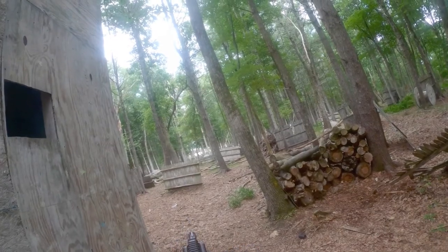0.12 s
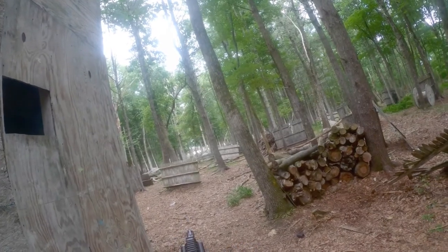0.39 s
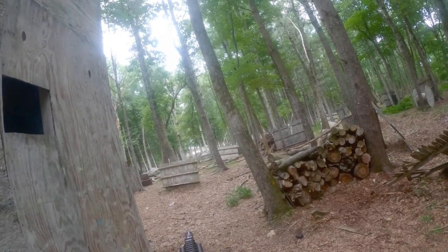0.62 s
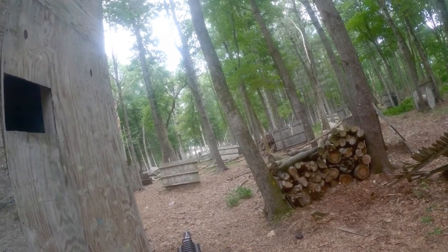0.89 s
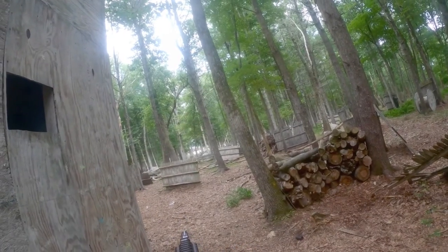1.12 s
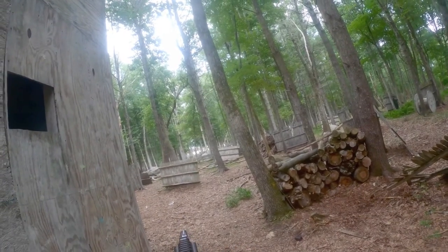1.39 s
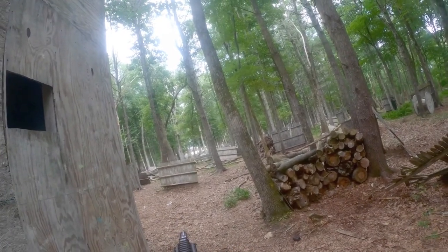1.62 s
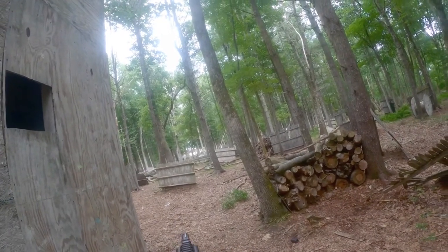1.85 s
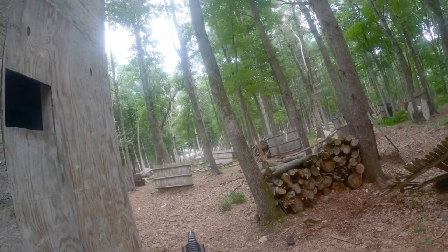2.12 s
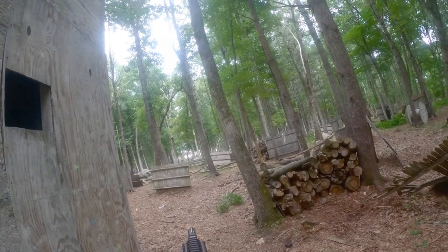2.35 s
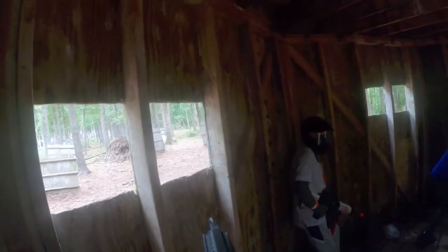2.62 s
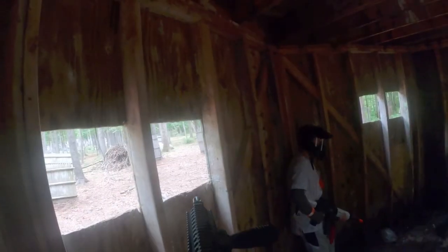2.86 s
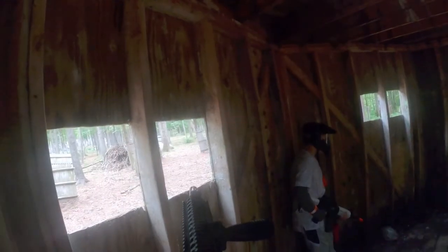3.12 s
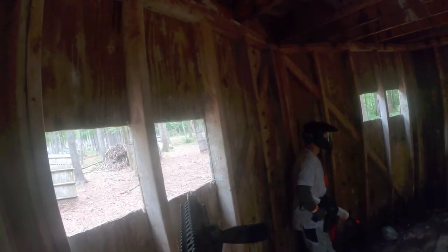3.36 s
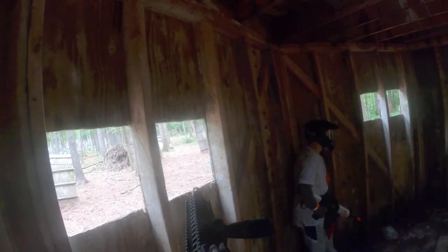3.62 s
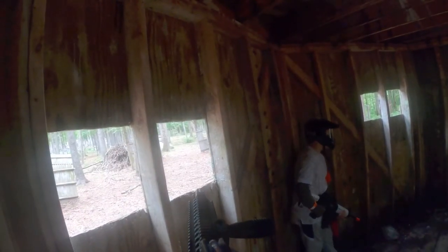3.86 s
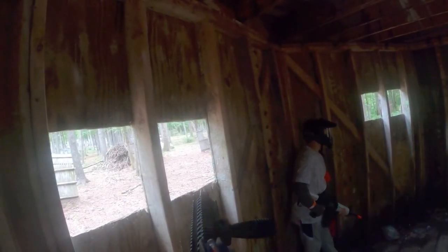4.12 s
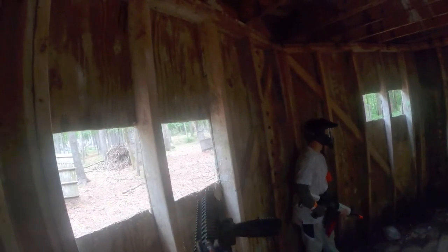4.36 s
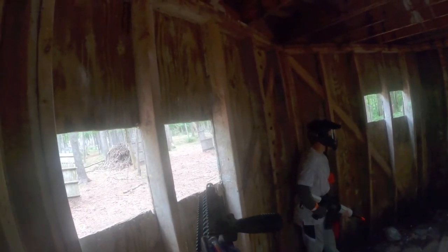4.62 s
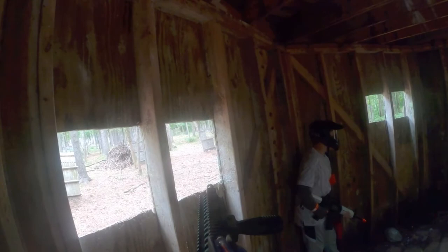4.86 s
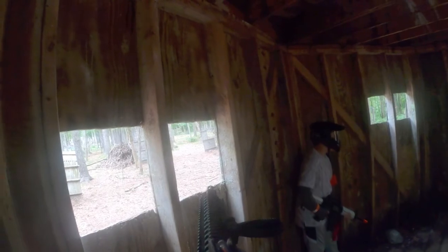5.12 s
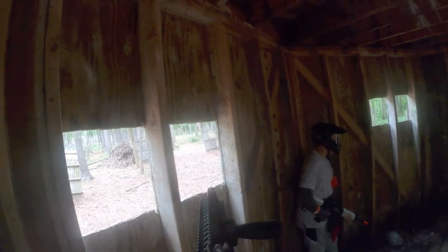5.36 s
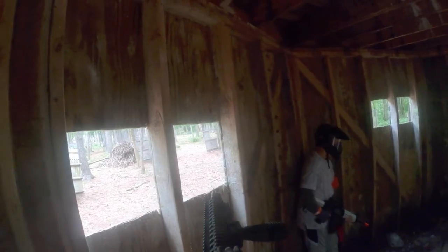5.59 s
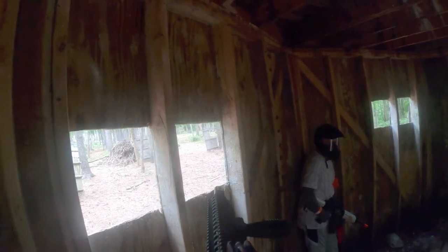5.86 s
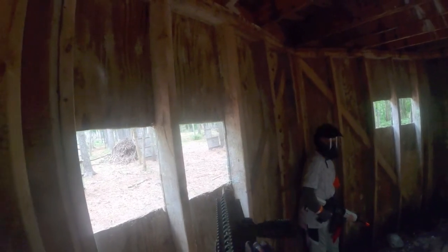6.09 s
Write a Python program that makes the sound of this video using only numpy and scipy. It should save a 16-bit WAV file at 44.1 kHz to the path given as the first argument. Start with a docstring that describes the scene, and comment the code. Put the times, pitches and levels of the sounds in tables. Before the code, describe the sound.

From 0 to 1.7 s an electric spring-piston gun fires eleven quick shots right beside a small cased camera among trees: each a short rising motor whine with gear rattle, a low thump and sharp metallic crack, then a falling whirr. The first shots come about 0.2 s apart, then 0.15 s; trigger ticks fall between some. A tiny dropout occurs at 0.61 s. From 1.8 to 2.5 s the gun rests; a soft bright noise swells near 1.95 s while a similar gun whines far off, growing. Around 2.58 s a shot begins and is cut as the level dips. Inside a plywood hut, hiss swells up and a pellet rattles on board at 2.8 s. From 3.0 s to the end, steady shots come about five per second, boxier and louder, with gusty rumble, low case knocks, notably at 3.5, 4.1, 4.4 and 4.9 s, and pellets striking boards at 4.8 s and repeatedly after 5.6 s.

```python
"""An electric spring-piston air gun fires a quick string of shots among trees, close to a small camera; the sound
cuts out for a moment. In a pause comes a soft bright swell of noise, likely the far gun's echo, as a like gun
whines far off. The level dips, then the gun fires on in a plywood hut, with stronger wind and buffets on the case
and pellets striking boards. At each pull a motor winds up (gear whine and rattle), the piston thumps the gun and
cracks, and the gears run down; after many pulls the trigger clicks back. Whines are sines, the rest mostly noise."""
import sys
import numpy as np
from scipy import signal
from scipy.fft import rfft, irfft
from scipy.io import wavfile
from scipy.ndimage import uniform_filter1d

SR = 44100
rng = np.random.default_rng(int(sys.argv[2]) if len(sys.argv) > 2 else 0)


def how_loud(loudness_db):
    """Turn decibels into a plain amplitude multiplier (0 dB gives 1, 20 dB gives 10)."""
    steps = np.asarray(loudness_db, float) / 20
    return 10 ** steps


def to_wav(sig):
    """Store sig (one row per channel, or 1-D mono) as 16-bit WAV at the path in sys.argv[1].

    Samples outside -1..1 are clipped; the rate is SR.
    """
    pcm = np.clip(np.atleast_2d(sig), -1, 1) * 32767
    pcm = np.round(pcm).astype(np.int16)
    wavfile.write(sys.argv[1], SR, pcm.T)  # frames by channels


N = 274743
TIME = np.arange(N) / SR
HUT_S, QUIET_S = 2.59, 2.75  # the hut begins; the gun is silent from then until QUIET_S
GAP_START_S, GAP_END_S = .612, .631  # a short gap of silence
USUAL_CATCH_S = .024  # usual time from the crack until the coasting gears catch again


def band(x, lo_hz, hi_hz, order=2):
    """Keep only the sound between two frequencies."""
    return signal.sosfilt(signal.butter(order, [lo_hz, hi_hz], "band", fs=SR, output="sos"), x)


def unit(x):
    """Scale to an rms level of 1."""
    return x / np.sqrt(np.mean(x ** 2))


def walk(rate):
    """Smooth random wander of spread 1; a higher rate wanders faster."""
    k = int(SR / rate)
    return unit(uniform_filter1d(uniform_filter1d(rng.standard_normal(N), k), k))


def add(out, s, x):
    """Mix x into out from time s in seconds."""
    i = int(round(s * SR))
    first, last = max(i, 0), min(i + len(x), N)
    out[first:last] += x[first - i:last - i]


def ring(hz, strength, t60, size=4096):
    """Sum of sine tones that die away, each losing 60 dB in its t60 seconds."""
    t = np.arange(size)[:, None] / SR
    decay = np.exp(-np.log(1000) * t / t60)
    return (strength * np.sin(2 * np.pi * hz * t) * decay).sum(axis=1)


def burst(rise_s, t60, size=6000):
    """Noise that swells and then dies away."""
    t = np.arange(size) / SR
    return rng.standard_normal(size) * (1 - np.exp(-t / rise_s)) * np.exp(-np.log(1000) * t / t60)


def echo(x, db, t60, size=24000):
    """Many blurred reflections of a space, made by smearing the sound with fading noise."""
    tail = band(burst(0.0061, t60, size=size), 89, 9000, order=1)
    return how_loud(db) * signal.fftconvolve(x, tail / np.sqrt(np.sum(tail ** 2)))[:N]


def air():
    """Soft wavering hiss of each place as plain noise, with a bright swell of noise in the pause."""
    trees_db, hut_db = -56, -42.5
    swell_db_per_s = 130  # the hut's air swells in until QUIET_S
    rising_db = hut_db - swell_db_per_s * np.clip(QUIET_S - TIME, 0, 1)
    level_db = np.where(TIME > HUT_S, rising_db, trees_db)
    out = rng.standard_normal(N) * how_loud(level_db + 4.8 * walk(23.0))
    far_swell = band(burst(0.013, .8, size=20000), 3300, 6000, order=1)  # likely the far gun's echo
    add(out, 1.945, how_loud(-37) * far_swell)
    return out


def rumble():
    """Gusty wind on the case: a deep roll and a quicker flutter above it, both from noise."""
    # Strength of the wind on the case. Each row: time in seconds, level in dB.
    wind = [(0.0, -50.5), (2.6, -45.5), (2.74, -34.5), (3.23, -30), (3.43, -41), (3.47, -23.5),
            (3.99, -40.5), (4.09, -31), (4.37, -33), (4.41, -20), (4.55, -29.5), (4.56, -33), (4.84, -36.5),
            (4.87, -25.5), (5.57, -35.5), (5.66, -40), (5.74, -32), (5.92, -41.5), (6.04, -20), (6.23, -32)]
    wind_db = np.interp(TIME, *np.transpose(wind))
    deep_noise = unit(band(rng.standard_normal(N), 28, 98))
    deep = deep_noise * how_loud(wind_db + 3 + 3.7 * walk(8.8))
    flutter_noise = unit(band(rng.standard_normal(N), 111.0, 287))
    flutter = flutter_noise * how_loud(wind_db - 2 + 3.9 * walk(28))
    return deep + flutter


def buffets():
    """Low tones of unsteady pitch and level as air or a hand shakes the case."""
    # Sudden shakes of the case. Each row: start in seconds, length in seconds, middle pitch in Hz, level in dB.
    shakes = [(2.155, 0.035, 173, -33), (2.739, 0.022, 193, -22), (3.027, 0.053, 125.6, -26),
              (3.469, 0.032, 76, -13), (4.051, 0.064, 126, -14.5), (4.056, 0.033, 250, -16),
              (4.083, 0.11, 112, -17.5), (4.087, 0.083, 311, -18.5), (4.304, 0.057, 372, -22),
              (4.39, 0.06, 250, -12.5), (4.421, 0.038, 142, -13), (4.871, 0.083, 105.6, -12.5),
              (4.874, 0.033, 250, -9.5), (4.951, 0.12, 93.7, -27), (5.15, 0.078, 112, -20.5),
              (5.184, 0.056, 331, -25), (5.577, 0.058, 328, -24), (5.703, 0.041, 271, -17.5),
              (5.787, 0.12, 276, -25), (5.995, 0.037, 296, -10.5), (5.998, 0.11, 79, -27),
              (6.054, 0.038, 300, -23)]
    out = np.zeros(N)
    t = np.arange(8000) / SR
    for s, length, hz, db in shakes:
        wobble = uniform_filter1d(rng.standard_normal((2, 8000)), size=300, axis=1) * 17
        shape = np.clip(t / 0.0065, 0, 1) * np.exp(-(t / length) ** 4)
        phase = 2 * np.pi * np.cumsum(hz * (1 + 0.11 * wobble[1])) / SR
        add(out, s, how_loud(db + 3.63 * wobble[0]) * shape * np.sin(phase))
    return out


def far_gun():
    """The same kind of motor far off: only a narrow range of its sound and a dull echo arrive."""
    # Pulls of the far gun. Each row: time in seconds, level in dB.
    far_shots = [(1.902, -45), (2.081, -31), (2.247, -26.5), (2.50, -19.5)]
    out = np.zeros(N)
    for s, db in far_shots:
        motor(out, s, .9, 1570, db, USUAL_CATCH_S)
    return band(out, 1370, 2160) + band(echo(out, -10, 0.31), 920, 2500)


def strikes():
    """Pellets on plywood: a noisy rattle coloured by the board's own pitch, and a low thud."""
    # Pellet hits. Each row: start in seconds, hit level in dB, thud level in dB relative to the hit,
    # decay time (60 dB) in seconds, board pitch in Hz.
    hits = [(2.772, -12.5, -34, 0.18, 2270), (4.838, -15, 4, 0.23, 1510), (5.596, -6.5, 0, 0.042, 2600),
            (5.81, -10, 6.5, 0.096, 1920), (6.016, -8, 3, 0.053, 2330), (6.206, -16, 3.5, 0.14, 1940)]
    out = np.zeros(N)
    for s, db, thud_db, t60, hz in hits:
        flutter = unit(uniform_filter1d(rng.standard_normal(6000), size=60))
        hit = burst(0.0031, t60) * how_loud(2.6 * flutter)  # random quick flutter of the hit's level
        board = band(hit, .88 * hz, 1.12 * hz, order=1)
        add(out, s, how_loud(db - 3) * band(hit, 500, 6500) + how_loud(db + 3) * board)
        add(out, s, how_loud(db + thud_db + 16) * band(burst(0.0036, 0.035), 133, 440.0))
    return out


def clicks():
    """The trigger springs back: a short tick of noise with a low thud under it."""
    # Trigger returns. Each row: start in seconds, tick level in dB, thud level in dB.
    returns = [(0.153, -12.5, 6), (0.363, -11.5, 11), (0.549, -18, -2), (0.742, -14, 3), (0.916, -8, 6.5),
               (1.512, -24, -24), (1.782, -13.5, -4), (3.09, -5, 6), (3.297, -7, 7), (3.661, -11.5, 0.5),
               (3.832, -34, -13), (4.031, -11.5, 4), (4.225, -8.5, 5.5), (4.802, -11, 7),
               (5.033, -10.5, -14), (5.229, -9.5, -5), (5.407, -11, 3), (5.628, -9, 2)]
    out = np.zeros(N)
    for s, tick_db, thud_db in returns:
        add(out, s, how_loud(tick_db) * band(burst(0.0059, 0.041), 410, 4000, order=1))
        add(out, s, how_loud(thud_db) * band(burst(0.0004, 0.015), 260, 338))
    return out


def mesh(t, loaded_hz):
    """Rate at which gear teeth meet: a quarter-sine climb, a sag while coasting, a straight run-down."""
    start_s, full_s, release_s = -.071, -.019, -0.00588  # seconds from the crack
    start_share = .285  # share of the loaded pitch at which the climb begins
    sag_hz_per_s, run_down_hz_per_s, rest_hz = 6000, 21000, 399
    climb = np.sin(np.pi / 2 * np.clip((t - start_s) / (full_s - start_s), 0, 1))
    hz = loaded_hz * (start_share + (1 - start_share) * climb)
    hz = hz - sag_hz_per_s * np.clip(t - release_s, 0, USUAL_CATCH_S - release_s)
    hz = hz - run_down_hz_per_s * np.clip(t - USUAL_CATCH_S, 0, None)
    return np.maximum(hz, rest_hz)


def motor(out, s, stretch, loaded_hz, db, catch):
    """Meeting gear teeth whine on a rising then falling tone with overtones; each tooth also rattles."""
    # Strength of the whine's tone and overtones, lowest first, in dB.
    mesh_db = [-1.5, -1, -6.5, -9]
    # The gearbox shell sings out near its own pitches. Each row: pitch in Hz, width in Hz, boost in dB.
    shell = [(1120, 280, 6), (1680, 450, 9), (2520, 300, 9), (3320, 550, 10), (5050, 700, 11),
             (6600, 800, 8)]
    # Effort over one pull: start, bite, full load, release, slam, coast, catch, run-down, stop.
    # Each row: usual time from the crack in seconds, whine in dB, rattle in dB.
    effort = [(-.074, -33, -42.5), (-.057, -24, -29), (-.035, -24.5, -25), (-.012, -27, -26),
              (-.006, -35, -19), (.010, -40, -17), (.016, -57, -27), (0.024, -35, -19.5),
              (.038, -27.5, -24), (.054, -31.5, -27.5), (.075, -57, -34.5), (.096, -64, -31)]
    usual, whine_db, rattle_db = np.transpose(effort)

    # Fit the usual timing to this pull: the wind-up is stretched, and the gears coast until they catch.
    at = np.where(usual < 0, usual * stretch, usual)
    at = np.where(usual > .02, at + catch - USUAL_CATCH_S, at)
    at = np.maximum.accumulate(at)
    # A pull halted by the gap goes on after it, so its earlier part starts sooner.
    halted = (s > GAP_END_S) & (s + at < GAP_END_S)
    at = at - (GAP_END_S - GAP_START_S) * halted
    t = at[0] + np.arange(int((at[-1] - at[0]) * SR)) / SR
    hz = mesh(np.interp(t, at, usual), loaded_hz)

    noise = rng.standard_normal((8, 11000))[:, :len(t)]
    wobble = uniform_filter1d(noise[:6], size=90, axis=1) * 11.8  # uneven teeth, smoothed over about 2 ms
    phase = 2 * np.pi * np.cumsum(hz * (1 + 0.016 * wobble[5])) / SR
    slow = 1 - hz / hz.max()
    tone_hz = np.outer(1 + np.arange(len(mesh_db)), hz)
    shell_db = sum(g / (1 + (2 * (tone_hz - f) / w) ** 2) for f, w, g in shell) - 8
    # The level of each overtone varies at random from pull to pull.
    shell_db = shell_db + 1.2 * rng.standard_normal((len(mesh_db), 1))
    whine = 0
    for k, g in enumerate(mesh_db):
        lag_db = 17 * k * slow  # overtones firm up only near full speed
        tone = np.sin((k + 1) * phase + k)
        whine = whine + how_loud(g + shell_db[k] - lag_db + 2.2 * wobble[k]) * tone

    flutter = uniform_filter1d(noise[7], size=44) * 5.66
    per_tooth = 1 + 0.86 * np.sin(phase)
    rattle = band(noise[6], 520, 7100, order=1) * per_tooth * how_loud(2.6 * flutter)
    # In the hut the whine starts stronger, then sinks into the rattle as the shots go on.
    hut_db = (1.5 - 1.6 * (s - HUT_S)) * (s > HUT_S)
    whine = how_loud(np.interp(t, at, whine_db) + hut_db) * whine
    rattle = how_loud(np.interp(t, at, rattle_db)) * rattle
    slack = band(burst(0.0015, 0.037), 900, 6000, order=1)  # slack taken up as the motor starts
    add(out, s + at[0] + 0.017, how_loud(db - 24.5) * slack)
    add(out, s + at[0], how_loud(db) * (whine + rattle))


def stock():
    """The stock, pushed for about 1 ms, rings at a few low pitches that die away."""
    # Low ways in which gun and holder shake. Each row: pitch in Hz, level in dB,
    # decay time (60 dB) in seconds, direction and share (no unit).
    low_modes = [(81.6, -10.5, 0.082, 0.87), (203.5, -8.5, 0.076, -1.036), (250, -15, 0.096, 1),
                 (300, -8.5, 0.047, -1.025)]
    hz, db, t60, sign = np.transpose(low_modes)
    push = np.hanning(50)
    shaken = np.convolve(ring(hz, how_loud(db) * sign, t60), push / push.sum())
    return band(shaken, 32, 3700, order=1)


def crack(thump_db):
    """A noise blast, heard plainly and through the ringing metal parts."""
    # Ringing of the metal parts. Each row: usual pitch in Hz, usual level in dB, decay time (60 dB) in seconds.
    metal = [(960, -2, 0.081), (2113, -5, 0.092), (2510, -7, 0.0092), (3000, -5, 0.038), (3525, 7.5, 0.045),
             (4115, -3, 0.077), (5050, -30, 0.025), (6170, -14, 0.0092), (6230, 13.5, 0.0073),
             (7350, 14, 0.0081), (8670, 16, 0.011)]
    hz, db, t60 = np.transpose(metal)
    scatter = rng.standard_normal((2, len(metal)))  # random small changes of pitch and level at every crack
    blast = how_loud(0.21 * thump_db) * burst(0.0015, 0.02, size=1500)
    parts = ring(hz * (1 + 0.028 * scatter[0]), how_loud(db + 3.1 * scatter[1]), t60, size=2048)
    out = how_loud(-38) * signal.fftconvolve(blast, parts)
    out[:len(blast)] += how_loud(-4.5) * blast
    return out


def gun():
    """Every pull runs the motor, jolts the stock and cracks through the metal parts."""
    # Each row: time of the crack in seconds, loaded gear pitch in Hz, motor level in dB, thump level in dB,
    # time from the crack until the gears catch in seconds.
    pulls = [(0.0659, 1714, -1.5, 1.6, .026), (0.2805, 1708, -2, 0.5, .027), (0.4686, 1711, -3, 0.2, 0.025),
             (0.6635, 1692, -3, 0.7, 0.025), (.832, 1688, -3, 0.4, 0.026), (0.9892, 1730, -4.5, 0.5, 0.028),
             (1.136, 1800, -3, -0.3, 0.029), (1.2747, 1736, -3.5, 0.2, 0.022),
             (1.419, 1639, -3, 0.3, 0.026), (1.5636, 1660, -3.5, -0.5, 0.028),
             (1.7051, 1642, -3.5, -0.2, 0.031), (2.583, 1735, -6, -8, .0096), (3.01, 1699, 3.5, 1, .011),
             (3.197, 1691, 1, 0.8, 0.022), (3.3856, 1685, 1, 0.3, 0.024), (3.5738, 1655, 0.5, -1.5, 0.027),
             (3.7641, 1660, 0, -0.3, 0.027), (3.954, 1652, 0.2, 0, 0.029),
             (4.1388, 1660, -0.5, -2.5, 0.028), (4.3345, 1688, -0.5, 0.3, .024),
             (4.544, 1644, -2, -2.5, 0.027), (4.7366, 1627, -.5, -1.7, 0.028),
             (4.9368, 1630, -1.5, 0, 0.027), (5.1366, 1680, -1.2, -2.5, .029),
             (5.3357, 1677, 0.4, -0.2, 0.033), (5.5413, 1648, 0.7, -0.9, 0.043),
             (5.7464, 1660, 1, -0.5, 0.051), (5.9477, 1634, 1.7, -1, 0.061), (6.1388, 1653, 0, -1.5, 0.026)]
    # The piston's release and slam. Each row: time from the crack in seconds, level in dB over the thump level.
    blows = [(-.0064, 1.45), (.0013, -3.5)]
    out, thump = np.zeros(N), stock()
    for s, loaded_hz, motor_db, thump_db, catch in pulls:
        stretch = 0.94 if s > HUT_S else 1.01  # length of the wind-up in each place
        motor(out, s, stretch, loaded_hz, motor_db, catch)
        add(out, s + catch, how_loud(thump_db - 9.5) * band(thump, 286, 500))
        for lag, blow_db in blows:
            add(out, s + lag, how_loud(thump_db + blow_db) * thump)
        add(out, s - .0025, crack(thump_db))
    return out


def scene():
    """Gun and far gun among trees, then the gun in the hut; air, wind and buffets lie under both."""
    inside = TIME > HUT_S
    near = gun() + clicks() + strikes()
    near[int(HUT_S * SR):int(QUIET_S * SR)] = 0  # the pull under way is lost with the first place
    outdoors = near * ~inside
    close_trees = echo(outdoors, -25, 0.18)
    deep_woods = echo(outdoors, -27.5, 2.7, size=66000)
    trees = (close_trees + deep_woods + far_gun()) * ~inside
    hut = echo(near * inside, -11, 0.29)
    mono = near + trees + hut + air() + rumble() + buffets()
    return np.array([mono, mono])


def case_response(size=4096):
    """The camera case colours the sound: a filter with the wanted gain that never rings ahead of its input."""
    # Broad colour of the case. Each row: frequency in Hz, gain in dB.
    slope = [(20, -0.5), (380, -2.5), (520, -5), (700, -8), (900, 0.5), (1400, -4.5), (2000, -2.5),
             (4200, -4), (5500, -13), (7500, -11.5), (10000, -21), (15000, -33.5)]
    # Resonances and notches of the case. Each row: frequency in Hz, width in Hz, gain in dB.
    peaks = [(387.8, 29.6, 8), (600, 40, -4), (1002, 83, 1.5), (1128, 97, 12), (1268, 177, -4.5),
             (1660, 270, 3.5), (2360, 910, 3), (2787, 130, -3.5), (3257, 100, 3), (4214, 470, 2),
             (4240, 160, 1.5), (5062, 150, 7), (5720, 130, -7), (6080, 1180, 5.5), (7000, 1400, -0.5),
             (8720, 73, -14), (8900, 1400, -2)]
    hz = np.arange(size // 2 + 1) * SR / size
    slope_hz, slope_db = np.transpose(slope)
    db = np.interp(np.log(hz + 1), np.log(slope_hz), slope_db)
    db = db + sum(g / (1 + (2 * (hz - f) / w) ** 2) for f, w, g in peaks)
    # Folding the cepstrum (the transform of the log gain) puts all the response after time zero.
    cepstrum = irfft(np.log(how_loud(db)))
    cepstrum[1:size // 2] *= 2
    cepstrum[size // 2 + 1:] = 0
    return irfft(np.exp(rfft(cepstrum)))


def top_cut(x):
    """Nothing passes above the cut-off."""
    return signal.sosfilt(signal.butter(12, 15710, fs=SR, output="sos"), x)


def record(dry):
    """Case colour, soft overload, level dip and short gap; only the top treble differs left and right."""
    # Dip at the change of place. Each row: time in seconds, gain in dB.
    fades = [(2.545, 0), (2.575, -7), (2.587, -36), (2.60, -9), (2.65, 0)]
    mono = signal.fftconvolve(dry[0], case_response())[:N]
    mono = np.tanh(0.96 * mono) / 0.92  # loud peaks are rounded off
    mono = mono * how_loud(np.interp(TIME, *np.transpose(fades)))
    outside_gap_s = np.maximum(GAP_START_S - TIME, TIME - GAP_END_S)
    mono = mono * np.clip(outside_gap_s * 1000, 0, 1)  # 1 ms edges
    mono = signal.sosfilt(signal.ellip(8, .2, 60, 15600, fs=SR, output="sos"), mono)  # steep low-pass, Hz
    top = band(mono, 12900, 19500, order=4)
    side = how_loud(1.5) * np.roll(top, shift=400) + 1.1 * top  # a copy about 9 ms later joins the treble
    return top_cut(np.array([mono + side, mono - side]))


dry = scene()
out = record(dry)
to_wav(out)
```